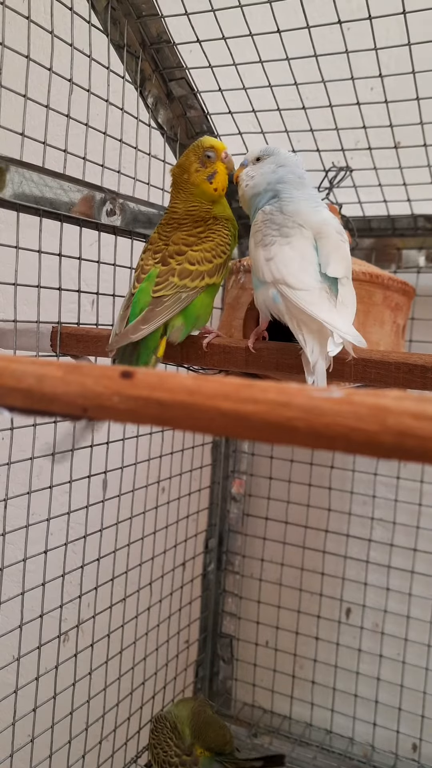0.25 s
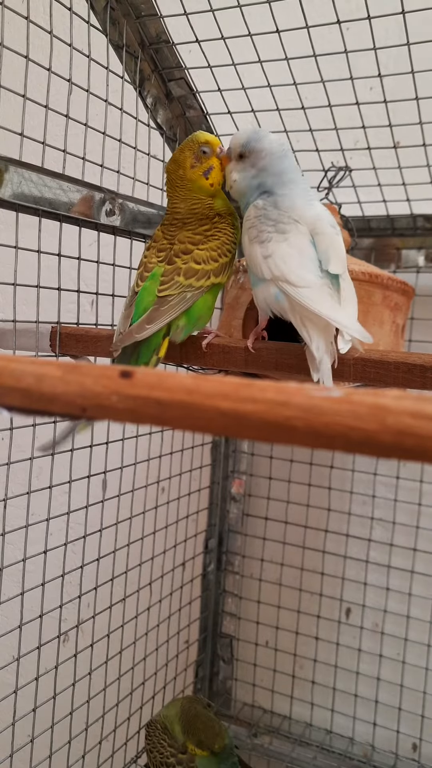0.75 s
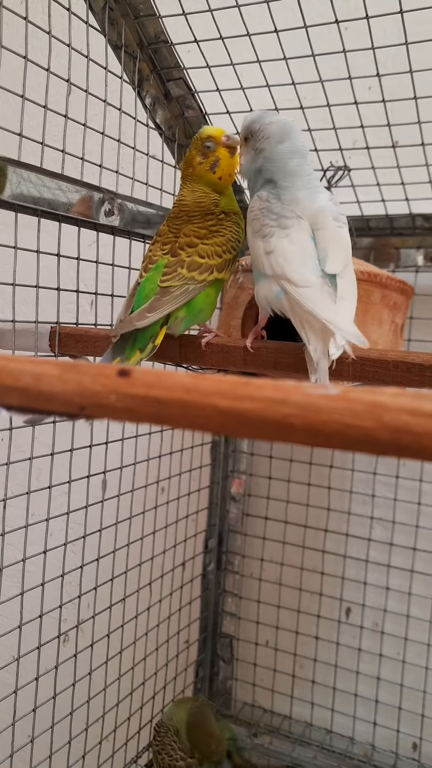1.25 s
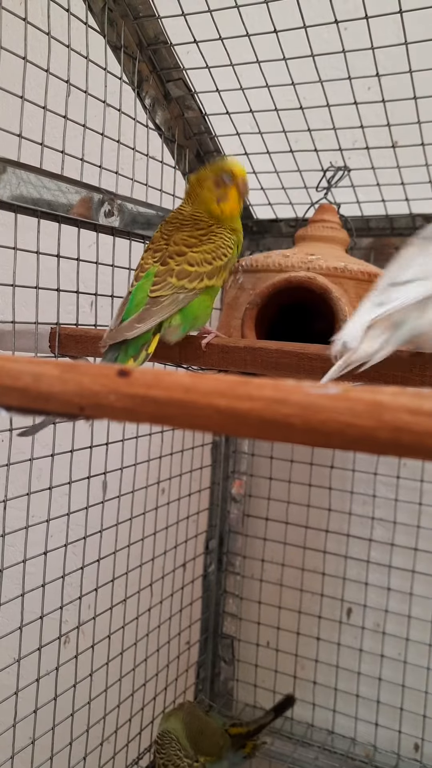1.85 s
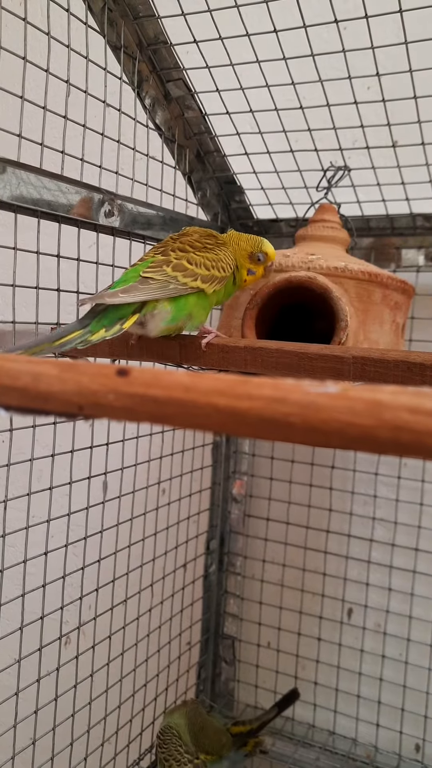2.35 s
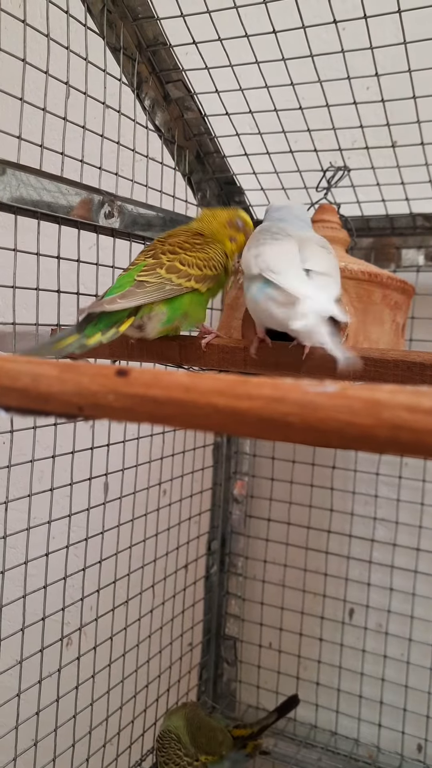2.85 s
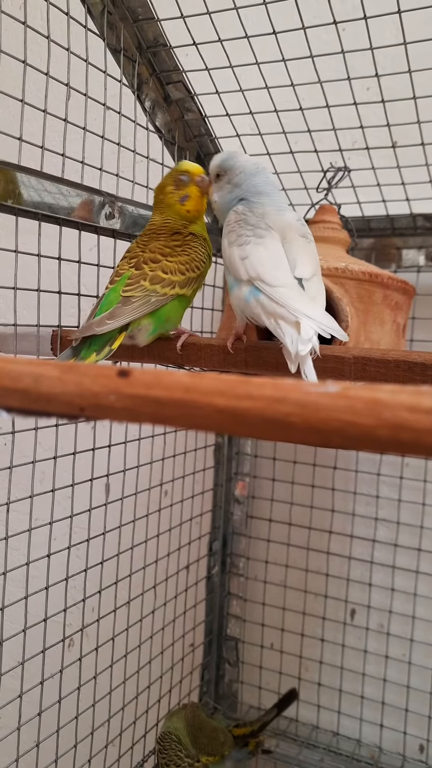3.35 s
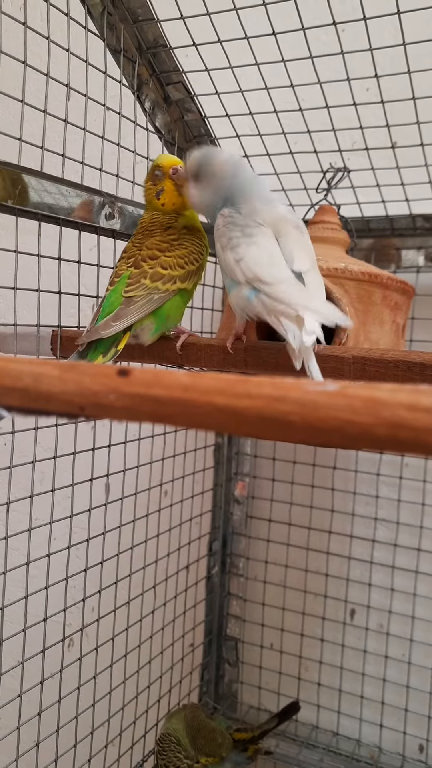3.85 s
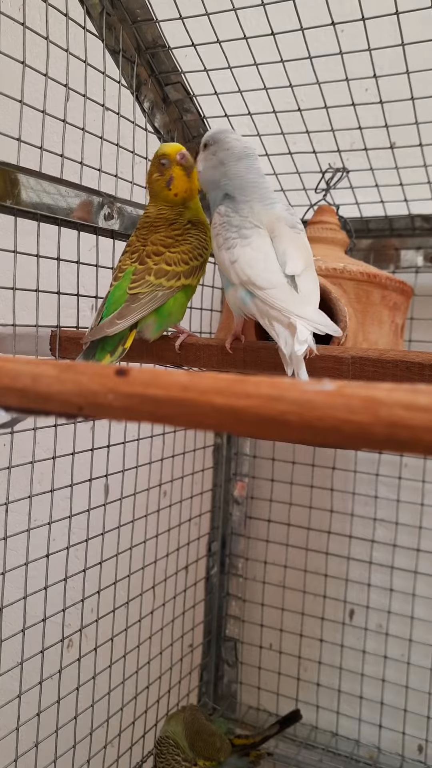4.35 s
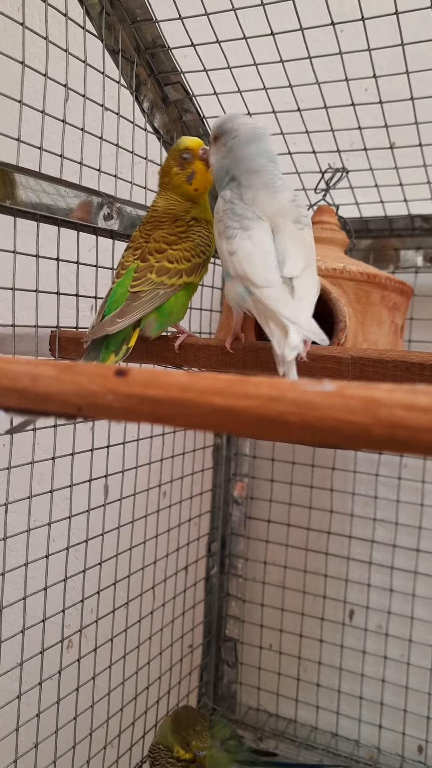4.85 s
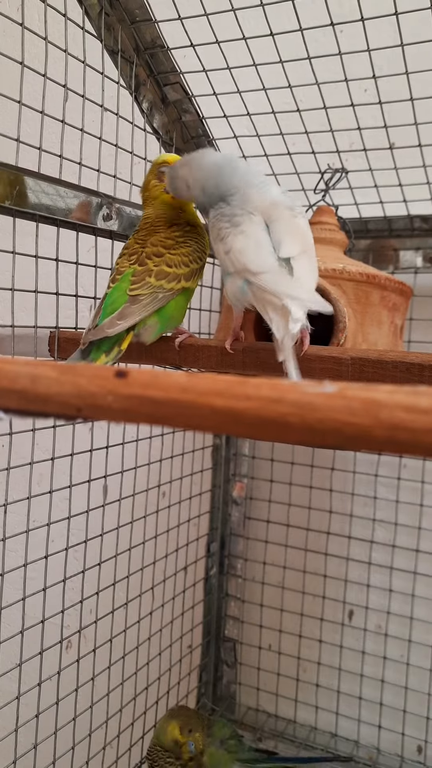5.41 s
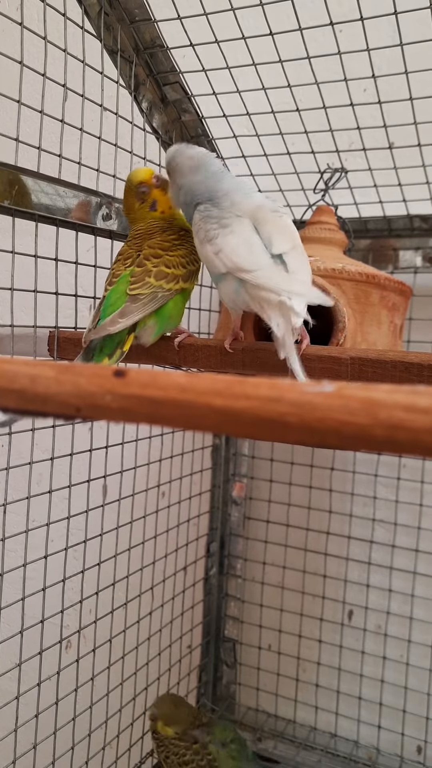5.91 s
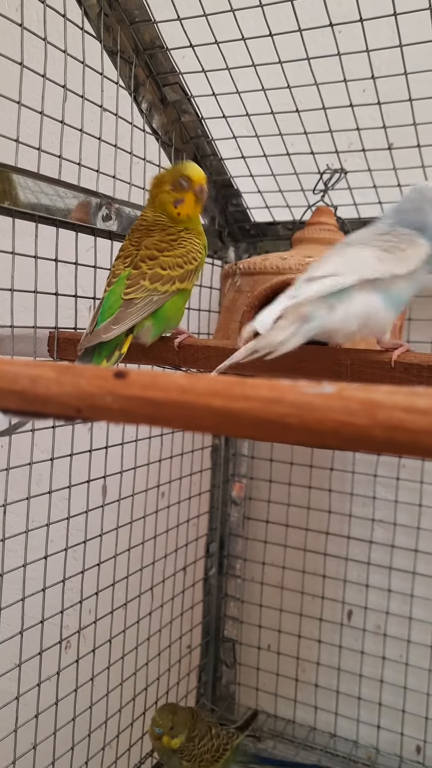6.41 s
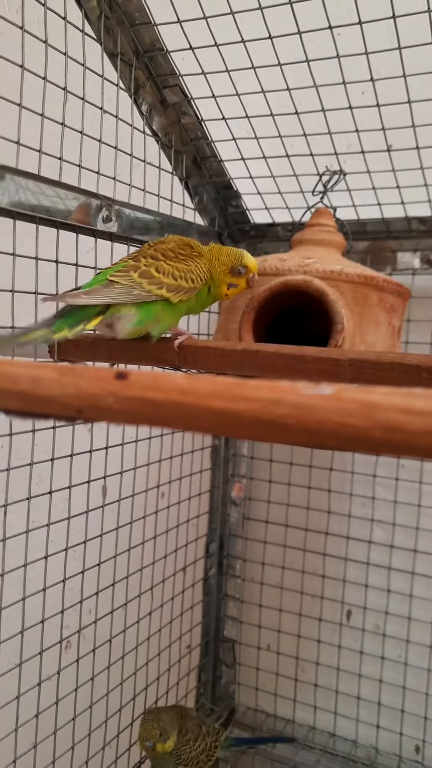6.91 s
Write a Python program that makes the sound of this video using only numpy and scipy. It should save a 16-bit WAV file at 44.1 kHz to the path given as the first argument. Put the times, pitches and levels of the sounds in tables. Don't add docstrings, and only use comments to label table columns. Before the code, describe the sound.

Two budgies on a perch in a hard-walled wire cage. A sharp click and faint warbling come first, then a string of clicks, whistles and a harsh squawk near two seconds. The loudest scolding comes at four seconds, followed by soft notes, spaced clicks and a last chirping squawk. Low traffic rumbles; the stereo is brighter on the right.

```python
import sys
import numpy as np
from scipy import signal
from scipy.io import wavfile
from scipy.ndimage import uniform_filter1d

SR = 44100
rng = np.random.default_rng(int(sys.argv[2]) if len(sys.argv) > 2 else 0)


def put_to_file(sound):
    columns = np.atleast_2d(sound).T
    safe = np.clip(columns, -1, 1)
    whole_steps = np.round(safe * 32767)
    wavfile.write(sys.argv[1], SR, whole_steps.astype(np.int16))


def invert_db(x):
    u = np.asarray(x, float) / 20
    return 10 ** u


N = 316197


def rms_one(x):
    return x / np.sqrt(np.mean(x ** 2) + 1e-20)


def in_time(tables):
    t, rows = np.arange(N) / SR, np.vstack(tables)
    on = sum((t >= table[0][0]) & (t <= table[-1][0]) for table in tables)
    level_db, *rest = [np.interp(t, rows[:, 0], column) for column in rows.T[1:]]
    return [invert_db(level_db) * uniform_filter1d(1. * on, size=200), *rest]


def at_hz(points, hz):
    points_hz, values = np.array(points)[:, :2].T
    return np.interp(np.log(hz), np.log(points_hz), values)


def drift(rate_hz):
    r = np.exp(-2 * np.pi * rate_hz / SR)
    return rms_one(signal.lfilter([1], [1, -2 * r, r * r], rng.standard_normal(N + SR))[SR:])


def band(x, lo_hz, hi_hz):
    return signal.sosfilt(signal.butter(2, [lo_hz, min(hi_hz, .45 * SR)], "band", fs=SR, output="sos"), x)


def resonate(x, hz, width_hz):
    r = np.exp(-np.pi * width_hz / SR)
    feedback = [1, -2 * r * np.cos(2 * np.pi * hz / SR), r * r]
    return signal.lfilter([(1 - r * r) / 2, 0, (r * r - 1) / 2], feedback, x)


def treble(x):
    upper = resonate(resonate(x, 13500, 3600), 13500, 3600)
    return resonate(x, 7600, 2100) - invert_db(0.5) * upper + invert_db(-10) * resonate(x, 12000, 1300)


def gestures(rows, attack_s, release_s, rise_db, fall_db):
    t = np.arange(N) / SR
    envelopes = []
    for s, hold_s, first_db, last_db, *_ in rows:
        times_s = [s - attack_s, s, s + hold_s, s + hold_s + release_s]
        levels_db = [first_db - rise_db, first_db, last_db, last_db - fall_db]
        envelopes.append(invert_db(np.interp(t, times_s, levels_db, left=-200, right=-200)))
    return np.array(envelopes)


def background():
    # start_s, level_db
    traffic = [(0.0, -70.5), (0.079, -60.5), (0.139, -71.5), (0.86, -63.5), (1.02, -70), (2.08, -65.5),
               (2.12, -70.5), (2.37, -63), (2.91, -69.5), (4.23, -59.5), (4.25, -70), (4.406, -52),
               (4.573, -54.5), (4.63, -60.5), (5.25, -67), (6.552, -60), (6.61, -59.5), (7.17, -63.5)]
    # freq_hz, density_db_per_hz
    air = [(24, -28), (40, 1.5), (226, -9.5), (290, -3.5), (529, -19.5), (585, -6.5), (751, -30.5),
           (810, -23.5), (1850, -28), (2320, -34.5), (7930, -49.5), (16000, -52)]
    # freq_hz, likeness
    likeness = [(40, 0.69), (125, 0.71), (250, 0.82), (600, 0.58), (2000, 0.73), (8000, 0.08)]
    # freq_hz, lean_db
    left_lean = [(60, -3), (110, 0.5), (200, -3), (380, -1.5), (700, -0.5), (1290, -7), (2380, 5.5),
                 (4400, -15.5), (8120, -22), (15000, 0)]
    rumble_db = np.interp(np.arange(N) / SR, *np.transpose(traffic))
    swing_db = rumble_db - rumble_db.mean()
    layers = np.zeros((3, 2, N))
    edges_hz = 25 * 2 ** np.arange(0, 9.6, .5)
    white = rng.standard_normal((2, 2, N))
    for k, (lo, hi) in enumerate(zip(edges_hz, edges_hz[1:])):
        hz = np.sqrt(lo * hi)
        mid, side = band(white[k % 2], lo, hi)
        alike, lean_db = np.clip(at_hz(likeness, hz), -1, 1), at_hz(left_lean, hz) / 2
        pair = np.sqrt(1 + alike) * mid + np.sqrt(1 - alike) * side * [[1], [-1]]
        if hz < 75:
            pair = pair * invert_db(uniform_filter1d(rumble_db, size=SR) - rumble_db.mean())
        layers[int(hz > 180) + int(hz > 600)] += invert_db(at_hz(air, hz) + [[lean_db], [-lean_db]]) * pair
    murmur_db, air_db = -63.5 + 0.53 * swing_db, -67.5 + drift(0.43)
    layers[0] = signal.sosfilt(signal.butter(4, 48, "high", fs=SR, output="sos"), layers[0])
    return sum(invert_db(db) * rms_one(layer) for db, layer in zip((rumble_db, murmur_db, air_db), layers))


def motor():
    # start_s, pitch_hz, level_db
    motor_rows = [
        (4.33, 144.7, -89),
        (4.342, 139, -56.5),
        (4.478, 148.4, -52),
        (4.652, 139.7, -64),
        (4.666, 146.4, -65),
        (4.7, 139, -64),
    ]
    level, hz = in_time([np.array(motor_rows)[:, [0, 2, 1]]])
    phase = 2 * np.pi * np.cumsum(hz) / SR
    roar = invert_db(-2.5) * rms_one(band(rng.standard_normal((2, N)), 520, 2080))
    return level * (np.sqrt(2) * (np.sin(phase) + 0.94 * np.sin(phase / 2)) + roar)


def trill():
    # start_s, level_db
    trill_rows = [
        (0.33, -88),
        (0.342, -64),
        (0.425, -68),
        (0.45, -89),
    ]
    level, = in_time([trill_rows])
    beat = np.maximum(np.sin(2 * np.pi * 125 * (np.arange(N) / SR - .003)), 0) ** 16
    ticks = band(beat * np.sign(rng.standard_normal(N)), 2500, 5100)
    return level * rms_one(band(ticks, 2540, 5100))


def rustle(voices):
    # start_s, length_s, first_db, last_db
    rustle_rows = [(0.172, 0.096, -60, -100), (1.204, 0.059, -55, -59), (1.27, 0.15, -74, -75),
                   (1.385, 0.013, -70, -86), (1.445, 0.0089, -60, -65.5), (1.508, 0.01, -59, -64.5),
                   (1.54, 0.012, -70, -72.5), (1.572, 0.013, -55, -69.5), (1.59, 0.058, -65, -80),
                   (1.67, 0.074, -96, -72), (1.81, 0.02, -55, -46.5), (2.26, 0.22, -57, -86),
                   (2.414, 0.076, -62, -69), (2.497, 0.02, -70.5, -58), (2.535, 0.01, -68, -71),
                   (2.585, 0.049, -64, -77), (2.7, 0.29, -72, -75), (3.782, 0.073, -61.5, -47),
                   (3.95, 0.016, -38.5, -30.5), (4.43, 0.32, -88.5, -90), (5.272, 0.028, -66, -82),
                   (6.03, 0.12, -50, -59.5), (6.142, 0.061, -44.5, -50.5), (6.22, 0.16, -61.5, -66.5),
                   (6.69, 0.004, -54, -75), (6.705, 0.27, -69.5, -85)]
    airflow_db, airflow_power = -25, 0.71
    level = gestures(rustle_rows, attack_s=.006, release_s=0.017, rise_db=6.0, fall_db=18).sum(axis=0)
    effort = np.maximum(uniform_filter1d(np.abs(voices), size=150), 0) / invert_db(-40)
    level = level * invert_db(3.5 * drift(13)) + invert_db(-38 + airflow_db) * effort ** airflow_power
    grains = (rng.random(N) < .15) * rng.standard_normal(N) * invert_db(2.0 * drift(37))
    husks = resonate(resonate(grains, 12100, 3000), 12100, 3000)
    return level * invert_db(-3.0) * rms_one(band(resonate(grains, 7600, 1400) - husks, 6000, 21000))


def clicks():
    # start_s, peak_db, ring_hz, length_ms
    plain_rows = [(0.6787, -27, 4486, 5.8), (1.223, -26, 3620, 5.8), (1.333, -36, 2160, 4.3),
                  (1.4435, -38.5, 3900, 6.4), (1.476, -37, 4340, 2.7), (1.572, -38.5, 4340, 7.3),
                  (1.605, -52, 2860, 9.9), (3.18, -43.5, 3480, 5.8), (3.497, -52.5, 4690, 6.4),
                  (3.617, -53.5, 3100, 3.2), (5.066, -42, 1900, 1.1), (5.0745, -32, 4630, 3.2),
                  (5.473, -37.5, 3200, 3), (5.6, -49, 3500, 1.4), (5.609, -31.5, 4410, 4.1),
                  (5.7455, -35, 4340, 4.8), (5.89, -30, 3040, 4.7), (6.036, -35, 5150, 7.5)]
    # start_s, peak_db, ring_hz, length_ms
    shut_rows = [
        (0.0115, -55, 3400, 10),
        (4.425, -34.5, 4900, 0.76),
        (4.976, -42, 2980, 4.7),
        (5.204, -53, 5100, 3.4),
        (5.214, -46.5, 4770, 4.6),
        (5.3335, -31, 4740, 4.4),
    ]
    # start_s, peak_db, ring_hz, length_ms
    open_rows = [(2.508, -62.5, 4900, 4), (2.582, -50, 2960, 1.6), (3.782, -50, 2200, 3.1),
                 (3.793, -46, 2780, 3.2), (3.8, -47, 3250, 2.4), (3.814, -41, 2500, 2),
                 (3.823, -41, 3000, 2.8), (3.846, -28.5, 4770, 3.8), (3.877, -36.5, 3600, 13),
                 (3.679, -60, 3000, 1.5), (3.69, -60, 3560, 3), (5.245, -63, 2250, 3.6),
                 (7.125, -60.5, 3570, 6.6)]
    ring_share = .4
    kinds = (plain_rows, -24), (shut_rows, -27), (open_rows, -13.5)
    rows = [(*row, hiss_db) for table, hiss_db in kinds for row in table]
    out, draws = np.zeros(N), rng.random((len(rows), 4))
    hiss = rms_one(band(treble(rng.standard_normal(N)), 3600, 10000))
    grit = rms_one(band(band(rng.standard_normal(N), 1900, 5900), 1900, 5900))
    body = rms_one(band(rng.standard_normal(N), 650, 1900))
    t = np.arange(round(0.012 * SR)) / SR
    for (s, db, hz, ms, hiss_db), turn in zip(rows, draws):
        low_db = -11 - 0.4547 * (db + 38.5)
        i, u = round(s * SR), t / max(ms, 1) * 2000
        here = slice(i, i + len(t))
        slack = 5.55 < s < 6.1
        valve_hz = (1097 if slack else 1546) * (.96 + 0.088 * turn[2])
        phase = 2 * np.pi * (t - 8.5 * t ** 2)
        low = np.sin(phase * valve_hz) + .7 * body[here]
        tone = invert_db(low_db - 0.5) * low + ring_share * np.sin(hz * phase + 6 * turn[0])
        tone = tone + ring_share * .6 * np.sin(phase * 2 * valve_hz + 6 * turn[1])
        tone = tone + 0.54 * grit[here] + invert_db(hiss_db + 6.5) * hiss[here]
        out[here] += invert_db(db) * (u * np.exp(1 - u)) ** 2 * tone
    return out


def arcs(glides, swoops, hooks, turns):
    rows = [(s, length_s, a, b, a, db) for s, length_s, a, b, db in turns]
    for table, share in (glides, .49), (swoops, 0.22), (hooks, .9):
        rows += [(s, length_s, a, min(a, b) + share * abs(a - b), b, db) for s, length_s, a, b, db in table]
    return rows


def notes(table, overtones_db):
    # freq_hz, gain_db
    beak_colour = [(1000, -4), (2500, 12), (4100, 10.5), (5200, -2.5), (6000, -13), (8000, -13),
                   (10500, -25), (14000, -12.5)]
    out, flutter = np.zeros((2, N)), invert_db(2.6 * drift(170))
    waver = 1 + .021 * drift(110)
    for s, length_s, start_hz, mid_hz, end_hz, db in table:
        i, n = round(s * SR), round(length_s * SR)
        u = np.arange(n) / n
        hz = start_hz * (1 - u) * (1 - 2 * u) + 4 * mid_hz * u * (1 - u) + end_hz * u * (2 * u - 1)
        phase = 2 * np.pi * np.cumsum(hz * waver[i:i + n]) / SR
        tone = np.sin(phase)
        brighter_db = .45 * (db + 36)
        for k, overtone_db in enumerate(overtones_db, start=2):
            gain = invert_db(overtone_db + brighter_db + at_hz(beak_colour, k * hz))
            tone = tone + gain * np.sin(k * phase + k)
        room_db = db - 3.5 - 0.085 * (db + 43.0)
        shape = rms_one(tone) * signal.windows.tukey(n, .3) * flutter[i:i + n]
        out[:, i:i + n] += invert_db(np.array([[db], [room_db]])) * shape
    return out


def whistled_notes():
    # start_s, length_s, first_hz, second_hz, level_db
    glide_rows = [(0.563, 0.035, 3420, 2520, -57.5), (0.55, 0.014, 2610, 3430, -58),
                  (0.8, 0.026, 1910, 2300, -58), (0.828, 0.013, 2200, 2500, -60.5),
                  (0.81, 0.024, 4700, 3600, -57), (0.838, 0.029, 4700, 2940, -61),
                  (0.85, 0.037, 1710, 1340, -68), (1.0, 0.032, 1780, 1160, -65.5),
                  (0.851, 0.012, 4130, 3950, -53.5), (0.936, 0.027, 2155, 2085, -59),
                  (0.953, 0.0166, 2120, 1520, -60.5), (0.996, 0.028, 2060, 2130, -62),
                  (1.073, 0.049, 1686, 1600, -67.5), (1.12, 0.012, 1680, 1550, -64),
                  (1.135, 0.039, 1380, 1330, -68), (1.135, 0.021, 2670, 2600, -67),
                  (1.674, 0.03, 3280, 3390, -41), (1.693, 0.025, 3060, 2590, -40),
                  (1.754, 0.015, 2480, 2250, -36.5), (1.788, 0.031, 3080, 3140, -41),
                  (1.801, 0.0045, 3030, 4360, -30.5), (1.806, 0.021, 4260, 2660, -31),
                  (2.262, 0.028, 1490, 1693, -49), (2.286, 0.019, 1825, 2180, -40.5),
                  (2.19, 0.024, 3630, 3200, -58), (2.8, 0.016, 2080, 2154, -58),
                  (2.833, 0.0114, 2280, 1820, -53), (2.308, 0.023, 2238, 1870, -42.5),
                  (2.327, 0.0032, 1990, 2080, -43), (2.688, 0.021, 4670, 4400, -55.5),
                  (2.7, 0.0515, 3990, 3710, -68), (2.738, 0.041, 2064, 1133, -52),
                  (2.844, 0.017, 1770, 1427, -48.5), (2.838, 0.032, 4050, 2840, -68.5),
                  (2.872, 0.014, 4130, 3560, -78), (2.85, 0.015, 5100, 3830, -54),
                  (3.403, 0.018, 1743, 1500, -62), (3.905, 0.03, 2570, 2340, -44)]
    # start_s, length_s, first_hz, second_hz, level_db
    later_rows = [(0.024, 0.046, 1300, 1065, -61), (3.972, 0.025, 1900, 1160, -32),
                  (3.972, 0.019, 3734, 3570, -19), (3.898, 0.026, 3720, 3580, -38),
                  (3.204, 0.025, 1763, 2063, -67.5), (3.329, 0.014, 1910, 2450, -58),
                  (4.656, 0.0086, 2800, 3200, -69), (4.665, 0.011, 1510, 1290, -65),
                  (4.841, 0.026, 3360, 2730, -64.5), (4.588, 0.022, 4020, 3870, -58),
                  (4.603, 0.0099, 2260, 2220, -58.5), (4.62, 0.034, 1936, 1500, -66.5),
                  (4.69, 0.034, 3650, 4020, -54.5), (4.77, 0.079, 1540, 1464, -66),
                  (6.18, 0.021, 2680, 3850, -44.5), (6.215, 0.011, 2030, 2320, -39.5),
                  (6.234, 0.017, 2010, 2900, -42.5), (6.245, 0.023, 2950, 2770, -34.5),
                  (6.412, 0.016, 2900, 2470, -48), (6.421, 0.018, 2465, 1970, -33.5),
                  (6.731, 0.013, 4700, 4310, -48), (6.829, 0.017, 2160, 1707, -44),
                  (6.845, 0.013, 1705, 1270, -50)]
    # start_s, length_s, first_hz, second_hz, level_db
    swoop_rows = [(0.5, 0.022, 3400, 2900, -54.5), (0.515, 0.011, 2850, 2540, -55),
                  (0.605, 0.0254, 2160, 1620, -64.5), (0.982, 0.02, 4770, 4200, -86),
                  (0.971, 0.028, 3290, 1994, -53.5), (1.722, 0.022, 3130, 3970, -37.5),
                  (2.735, 0.013, 4000, 3680, -58), (2.876, 0.044, 1420, 1068, -60),
                  (3.427, 0.021, 1800, 1466, -57.5), (4.457, 0.018, 3780, 4450, -58),
                  (6.134, 0.016, 3550, 3110, -41.5), (6.145, 0.041, 3100, 2554, -42.5),
                  (6.39, 0.022, 3510, 3206, -38.5)]
    # start_s, length_s, first_hz, second_hz, level_db
    hook_rows = [(2.155, 0.038, 1381, 1100, -43), (4.5, 0.025, 2148, 1500, -56.5),
                 (4.84, 0.046, 1650, 1476, -66.5), (0.937, 0.032, 4270, 2900, -71),
                 (1.076, 0.037, 3300, 2600, -64.5), (1.732, 0.015, 3760, 4290, -35),
                 (2.28, 0.0063, 4440, 5130, -46.5), (2.355, 0.038, 1567, 1410, -46.5),
                 (2.72, 0.03, 2085, 1526, -47), (2.832, 0.0092, 4120, 3940, -55.5),
                 (3.349, 0.019, 2670, 2620, -53.5), (4.711, 0.023, 3980, 2920, -52.5),
                 (6.19, 0.016, 3770, 4380, -32), (6.255, 0.036, 2890, 3745, -34)]
    # start_s, length_s, first_hz, second_hz, level_db
    turn_rows = [(0.526, 0.02, 2770, 2550, -58), (1.113, 0.015, 2740, 3270, -62),
                 (2.69, 0.023, 2234, 2080, -50), (3.343, 0.025, 2090, 2087, -59),
                 (4.457, 0.028, 1810, 1900, -57), (4.468, 0.014, 2007, 2274, -52.5),
                 (4.484, 0.014, 2000, 2250, -58), (4.56, 0.03, 3870, 4450, -54),
                 (4.575, 0.025, 2270, 1900, -57), (4.7, 0.0052, 3850, 4480, -54),
                 (6.451, 0.0072, 3320, 3270, -27), (6.707, 0.055, 1826, 1470, -51.5),
                 (6.802, 0.027, 2195, 1980, -45.5)]
    return notes(arcs(glide_rows + later_rows, swoop_rows, hook_rows, turn_rows), [-15.5, -25])


def reedy_notes():
    # start_s, length_s, first_hz, second_hz, level_db
    glide_rows = [(0.012, 0.013, 1760, 1580, -57), (6.478, 0.012, 1148, 805, -41.5),
                  (1.826, 0.013, 1446, 855, -40), (2.136, 0.025, 889, 1148, -39.5),
                  (2.257, 0.0093, 1260, 860, -48), (2.645, 0.019, 835, 940, -56.5),
                  (2.768, 0.016, 1160, 1080, -60.5), (2.792, 0.028, 1023, 1120, -59),
                  (3.29, 0.011, 1630, 1810, -64.5), (3.942, 0.014, 1990, 2320, -27.5),
                  (3.955, 0.023, 2100, 1970, -16), (4.703, 0.03, 2074, 1840, -61.5),
                  (4.9755, 0.0057, 1613, 1410, -41.5), (5.334, 0.01, 1647, 1460, -40),
                  (6.683, 0.023, 1327, 1678, -37), (6.437, 0.058, 2150, 1037, -44.5)]
    # start_s, length_s, first_hz, second_hz, level_db
    swoop_rows = [
        (1.951, 0.024, 1185, 978, -46),
        (2.015, 0.02, 1087, 868, -58),
        (3.722, 0.017, 1630, 1730, -63.5),
    ]
    # start_s, length_s, first_hz, second_hz, level_db
    hook_rows = [
        (3.568, 0.03, 1334, 1519, -52),
        (3.757, 0.039, 1380, 1786, -58.5),
    ]
    # start_s, length_s, first_hz, second_hz, level_db
    turn_rows = [
        (4.887, 0.041, 1400, 1535, -74.5),
    ]
    return notes(arcs(glide_rows, swoop_rows, hook_rows, turn_rows), [-4, -7, -10.5, -11, -22.5, -13])


def squawks():
    # start_s, hold_s, first_db, last_db, beak_hz
    squawk_rows = [(0.038, 0.04, -54, -65, 2292), (1.856, 0.033, -19, -14.5, 4344),
                   (2.148, 0.008, -27, -35, 4720), (2.649, 0.041, -59, -62.5, 3485),
                   (2.689, 0.07, -54.5, -58, 3987), (2.775, 0.043, -57.5, -60, 2017),
                   (2.821, 0.04, -61, -59, 3747), (2.88, 0.06, -63.5, -70.5, 3639),
                   (3.793, 0.055, -49.5, -46.5, 3694), (3.877, 0.012, -41, -36.5, 4630),
                   (3.903, 0.036, -39.5, -35.5, 4245), (3.98, 0.021, -19, -25, 4180),
                   (4.001, 0.02, -27, -33.5, 4170), (4.077, 0.024, -20, -18.5, 5660),
                   (4.104, 0.052, -18.5, -17.5, 4520), (4.431, 0.064, -43.5, -81, 4246),
                   (6.438, 0.024, -29, -24, 3740), (6.47, 0.016, -17, -16.5, 4056)]
    # freq_hz, width_hz, level_db
    throat_rows = [(1900, 2000, -4), (3200, 4300, 2), (5270, 3700, -0.5), (7140, 1200, -27)]
    calls = gestures(squawk_rows, attack_s=.012, release_s=0.0057, rise_db=17, fall_db=23)
    effort = uniform_filter1d(calls.sum(axis=0), size=100)
    beak_hz = np.array(squawk_rows)[calls.argmax(axis=0), -1]
    effort_db = 20 * np.log10(np.abs(effort) + 1e-12)
    hiss_db = -21 + 2.01 * np.maximum(effort_db + 28, 0)
    cycles = np.cumsum(1700 * invert_db(4.3 * drift(400))) / SR
    pulses = np.diff(np.floor(cycles), prepend=0) * invert_db(0.62 * rng.standard_normal(N))
    throat = sum((-1) ** k * invert_db(db) * rms_one(resonate(pulses, hz, width_hz))
                 for k, (hz, width_hz, db) in enumerate(throat_rows))
    slow = signal.lfilter([1], [1, -np.exp(-np.pi * 220 / SR)], pulses * rng.choice([-1, 1], N))
    beak_phase = 2 * np.pi * np.cumsum(beak_hz * (1 + .06 * drift(44.65))) / SR
    beak = rms_one(slow) * np.sin(beak_phase)
    rasp = invert_db(1.5 * drift(200))
    voice = band(throat + .45 * beak, 1050, 16000)
    hiss = rms_one(band(treble(pulses + 0.042 * rng.standard_normal(N)), 2400, 17000))
    return effort * rasp * invert_db(-6) * (rms_one(voice) + invert_db(hiss_db - 2) * hiss)


def nooks(x):
    # (freq_hz, level_db)
    perches = [
        ((1.8, 2.0), [(3210, 6), (3810, 6), (4270, 6), (4840, 4), (5750, 4), (6400, 2), (7410, 3), (11580, 8), (12740, 8), (15300, 5)]),
        ((3.86, 4.3), [(3125, 4), (3680, 8), (4120, 7), (4540, 9), (5320, 3), (5680, 7), (6990, 5), (8700, 4), (9900, 5), (13680, 6), (14400, 6)]),
        ((6.4, 6.55), [(2400, 3), (3160, 3), (3480, 6), (4030, 5), (4850, 7), (5200, 5), (7790, 4), (10680, 6), (12720, 5)]),
    ]
    t, out = np.arange(N) / SR, x.copy()
    for (start_s, end_s), rings in perches:
        here = x * ((t > start_s) & (t < end_s))
        out += (invert_db(-3) - 1) * here
        for hz, db in rings:
            out += invert_db(db) * resonate(here + 1e-18, hz, 102 * (hz / 4000) ** .5)
    return out


def room(x):
    # freq_hz, t60_s
    decay = [(800, 0.46), (2000, 0.35), (5000, 0.33), (8000, 0.29), (13000, 0.26)]
    # delay_s, level_db
    near_surfaces = [(.0055, -11), (.036, -9.5)]
    t, edges_hz = np.arange(SR // 2) / SR, 500 * 2 ** np.arange(0, 5.5, .5)
    white = rng.standard_normal((2, 2, len(t)))
    tail = sum(band(white, lo, hi) * invert_db(-60 * t / at_hz(decay, lo)) for lo, hi in zip(edges_hz, edges_hz[1:]))
    tail = tail * np.minimum(t / 0.0072, 1)
    tail = invert_db(1.5) * tail / np.sqrt(np.sum(tail ** 2, axis=2, keepdims=True))
    turns_per_s = 2.5
    facing = 2 * np.pi * turns_per_s * np.arange(N) / SR + 1.5 * drift(16)
    out = sum(signal.oaconvolve(pair, (share * x)[None], axes=1)[:, :N]
              for pair, share in zip(tail, (np.cos(facing), np.sin(facing))))
    for delay_s, db in near_surfaces:
        left, right = np.roll(x, round(delay_s * SR * 1.07)), np.roll(x, round(delay_s * SR))
        out += invert_db(db) * np.array([left, right])
    return out


def ports(x):
    dull = signal.sosfiltfilt(signal.butter(8, 5700, fs=SR, output="sos"), x[0])

    def shadowed(lag_s, db, shadow_hz):
        late = np.interp(np.arange(N) - lag_s * SR, np.arange(N), dull)
        return invert_db(db) * signal.lfilter(*signal.butter(1, shadow_hz, fs=SR), late)

    front, far_right = shadowed(-0.000058, -0.81, 4000), shadowed(0.00038, -0.79, 2400)
    t = np.arange(N) / SR
    return np.array([np.where((t > 3.77) & (t < 4.4), far_right, front), x[1]])


def scene():
    voices, voices_far = whistled_notes() + reedy_notes() + trill()
    small, harsh = clicks() + rustle(voices), squawks()
    to_walls = voices_far + small + invert_db(-3.0) * harsh
    walls = signal.lfilter(*signal.butter(1, 4960, fs=SR), to_walls)
    return ports(voices + small + nooks(harsh) + room(walls)) + background() + motor()


def low_pass(x):
    return signal.sosfilt(signal.butter(12, 16460, fs=SR, output="sos"), x)


def record(dry):
    dry = dry - 0.57 * resonate(dry, 9750, 1600) + 1.2 * resonate(dry, 18000, 1500)
    rounded = .52 * np.tanh(dry / .52)
    cut = signal.sosfilt(signal.cheby2(12, 60, 16400, fs=SR, output="sos"), rounded)
    return low_pass(cut)


dry = scene()
out = record(dry)
put_to_file(out)
```